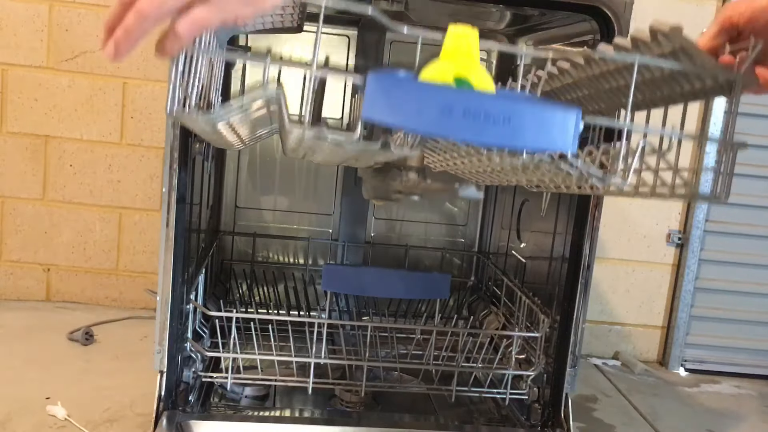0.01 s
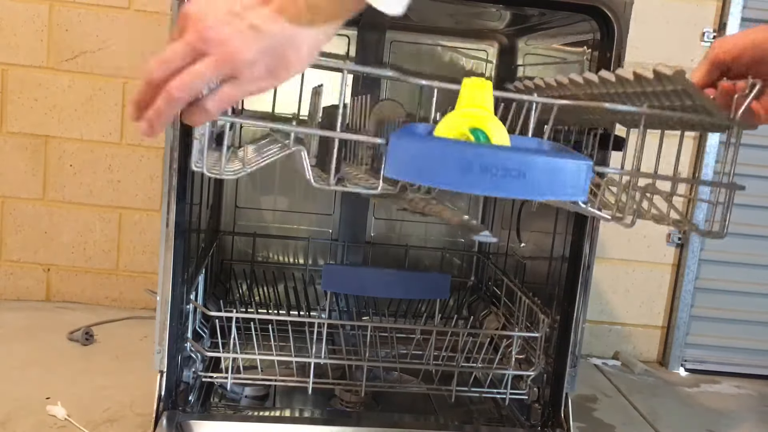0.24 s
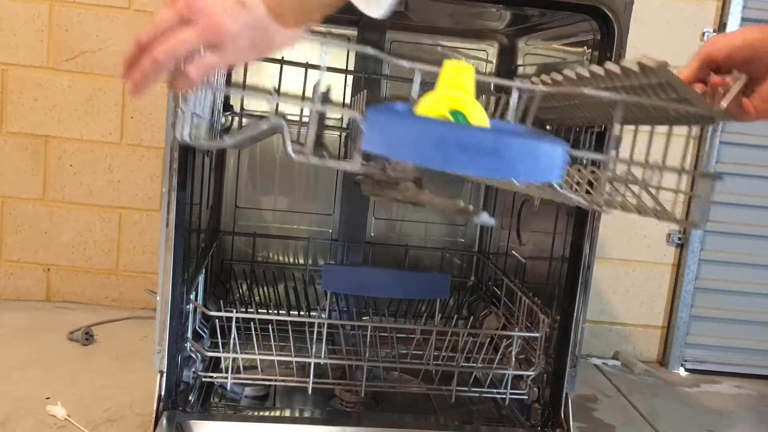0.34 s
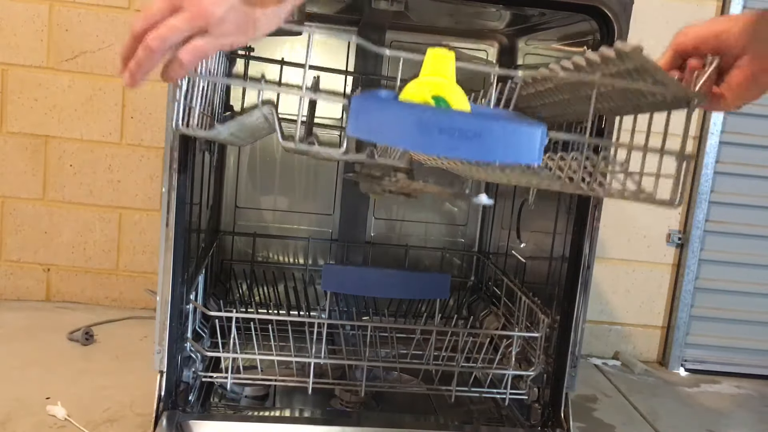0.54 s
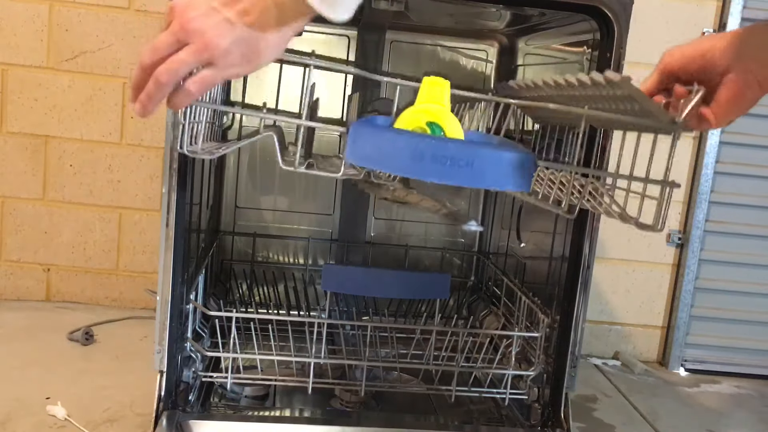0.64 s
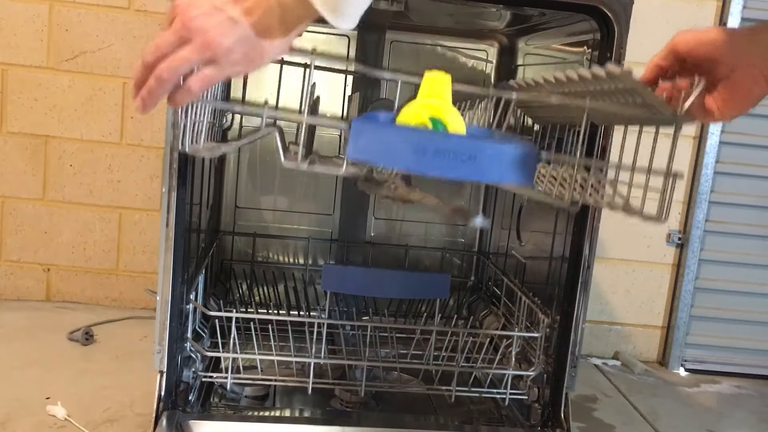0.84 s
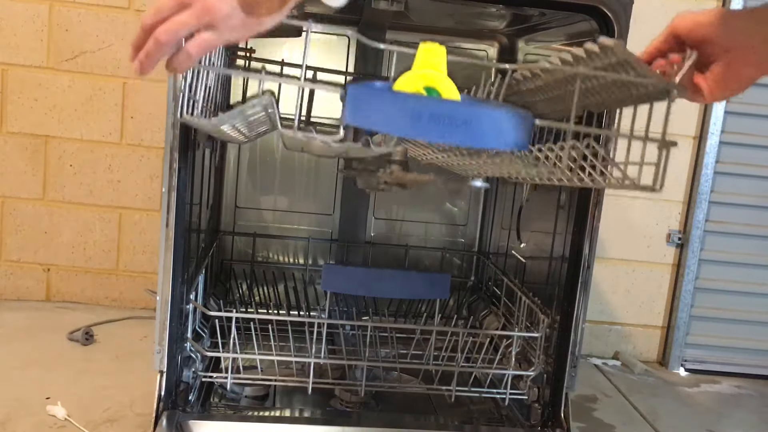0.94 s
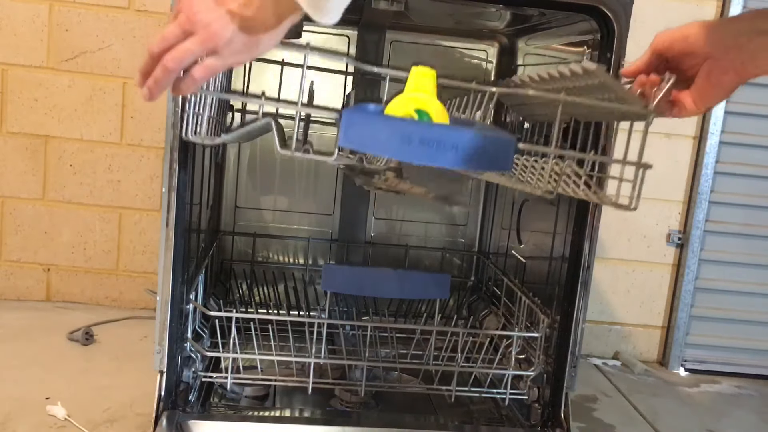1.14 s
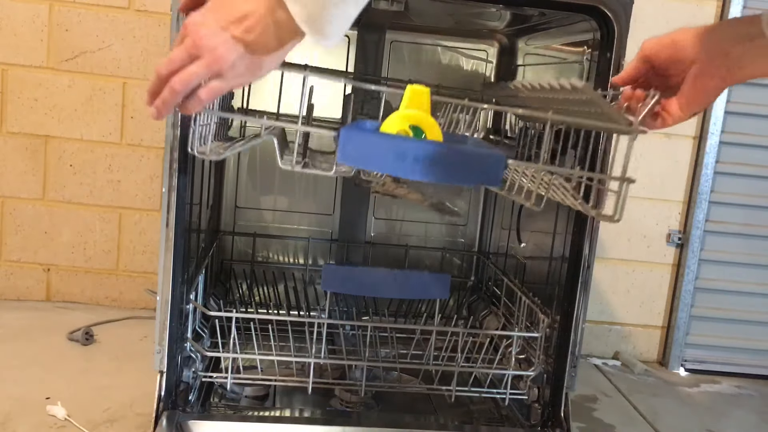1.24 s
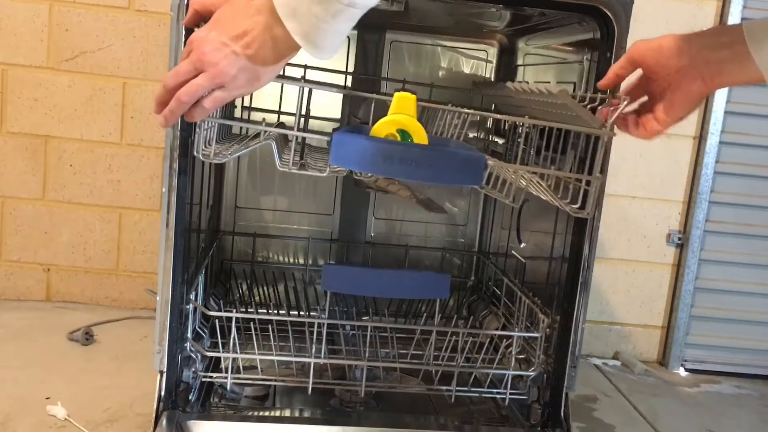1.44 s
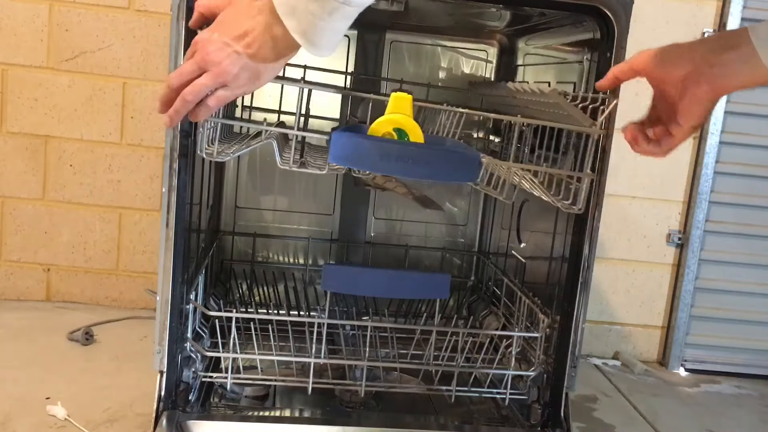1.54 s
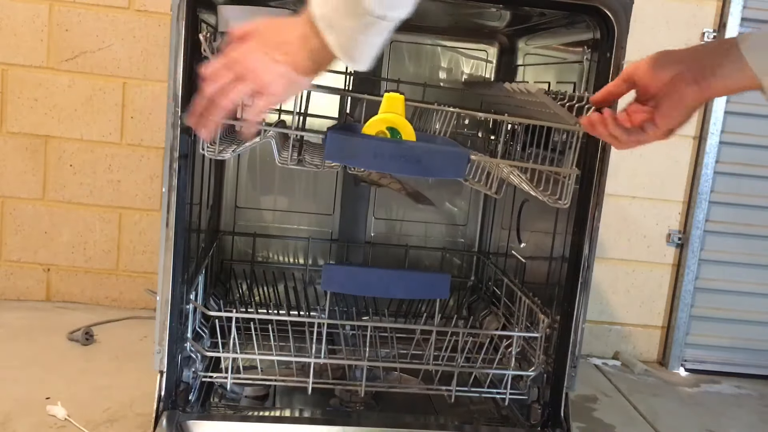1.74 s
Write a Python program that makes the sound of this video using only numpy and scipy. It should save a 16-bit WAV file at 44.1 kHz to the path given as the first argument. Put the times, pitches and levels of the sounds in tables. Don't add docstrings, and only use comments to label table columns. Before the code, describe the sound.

A metal wire dishwasher rack is fitted onto its rails. Faint touches from 0.1 s lead to a dense, jangling clatter at 0.25-0.31 s with a hollow tub thump. After a short gap, a brighter, hard clack lands at 0.64-0.67 s with another boom. Light clinks and shivering wires follow from 0.8 to 1.35 s, fading to faint ticks near 1.7 s. Hard-walled room echo, quiet low hush.

```python
import sys
import numpy as np
from scipy import signal
from scipy.fft import rfft, irfft
from scipy.io import wavfile
from scipy.ndimage import uniform_filter1d

SR = 44100
rng = np.random.default_rng(int(sys.argv[2]) if len(sys.argv) > 2 else 0)


def dump_mix(stems):
    frames = np.atleast_2d(stems).T
    limited = np.clip(frames, -1, 1)
    pcm = np.round(limited * 32767).astype(np.int16)
    wavfile.write(sys.argv[1], SR, pcm)


def makeup_ratio(level_db):
    decades = np.asarray(level_db, float) / 20
    return 10 ** decades


N = 79380


def evened(x):
    return x / np.sqrt(np.mean(x ** 2) + 1e-20)


def unit_energy(x):
    return x / np.linalg.norm(x)


def read(points, hz):
    f, value = np.transpose(points)
    return np.interp(np.log(hz + 1), np.log(f + 1), value)


def add(mix, s, sound):
    part = mix[max(round(s * SR), 0):][:len(sound)]
    part += sound[:len(part)]


def ring(modes, t, extra_db, phase):
    hz, db, t60 = np.transpose(modes)[:, :, None]
    decay = makeup_ratio(db + extra_db[:, None] - 60 * t / t60)
    return (decay * np.sin(2 * np.pi * (hz * t + phase[:, None]))).sum(0)


def clicks(count, per_s):
    draw = rng.random((count, 3))
    size = makeup_ratio(-4.5 * np.log(draw[:, 0] + 0.015))
    return size * np.sign(draw[:, 1] - 0.5) * (draw[:, 2] < per_s / SR)


def spot_db(hz, bright_db, clank_hz):
    octaves = np.log2((hz + 1) / clank_hz)
    return bright_db * np.log2((hz + 50) / 4000) + 6.0 * np.exp(-(octaves / 0.2) ** 2)


def wire_thicket(colour, bright_db, clank_hz):
    size, t60_s, evenness, patchy_db = 4096, 0.052, 0.7, 1.0
    hz = np.fft.rfftfreq(size, 1 / SR)
    burst = rng.standard_normal(size) * makeup_ratio(-60 * np.arange(size) / SR / t60_s)
    spectrum = rfft(burst)
    burst = irfft(spectrum / (abs(spectrum) + 1e-9) ** evenness)
    patches = evened(uniform_filter1d(rng.standard_normal(len(hz)), size=50))
    level_db = read(colour, hz) + spot_db(hz, bright_db, clank_hz) + patchy_db * patches
    taps = signal.firwin2(255, hz, makeup_ratio(level_db), fs=SR)
    return np.convolve(burst, taps)[120:]


# f/Hz, level/dB, t60/s
TINE_MODES = [(1568, 3.5, 0.48), (2326, 12.5, 0.26), (2700, -9, 0.13), (2800, -5, 0.42), (3472, -4, 0.1),
              (3390, -21, 0.41), (3680, -35, .15), (4086, -21, 0.17), (5130, -6, 0.27), (5600, 11, 0.079),
              (6300, 0, 0.36), (6800, 1, 0.067), (8700, 12, 0.36), (10200, -7, 0.31)]


def ringing_tines(bright_db, clank_hz):
    detune, spread_db, struck_db = 0.012, 3.0, 12
    t = np.arange(8192) / SR
    bunch = np.tile(TINE_MODES, (3, 1))
    draw = rng.standard_normal((2, len(bunch)))
    bunch[:, 0] *= 1 + detune * draw[1]
    hz = bunch[:, 0]
    struck = abs(hz / clank_hz - 1) < 0.03
    extra_db = spread_db * draw[0] + spot_db(hz, bright_db, clank_hz) + struck_db * struck
    return ring(bunch, t, extra_db, np.zeros(len(bunch)))


def rack_body(colour, bright_db, clank_hz):
    out = makeup_ratio(-16) * unit_energy(ringing_tines(bright_db, clank_hz))
    add(out, 0, unit_energy(wire_thicket(colour, bright_db, clank_hz)))
    return out


# t/s, peak level/dB, chatter length/s, brightness/(dB per octave), clank f/Hz
SETTING_DOWN = [(0.1, -40, 0.0084, -0.3, 6170), (0.152, -40.5, .011, -3, 5330),
                (0.167, -34.5, 0.013, -2, 2820), (0.191, -42.5, .02, -7, 2200),
                (0.229, -36, 0.0068, -7, 3300), (0.2466, -23.5, 0.0071, -3, 2400),
                (0.26, -14.5, 0.016, 1, 5740), (0.2789, -12, 0.0086, 0.5, 4100),
                (0.291, -12, 0.0075, -0.3, 3030), (0.3066, -18, 0.013, -0.2, 8800),
                (0.346, -34.5, .015, -7, 2850), (0.622, -36, 0.012, 2, 2700),
                (0.631, -30.5, 0.014, -5, 2920), (0.6431, -8, 0.014, 3.5, 3300),
                (0.653, -8.5, 0.013, 1.5, 6300), (0.6707, -12.5, 0.016, -1.4, 3700)]
SLIDING_IN = [(0.823, -30.5, 0.025, -1.5, 4160), (0.858, -50, 0.0063, -15, 8600),
              (0.924, -28, 0.0063, -4.5, 3200), (0.931, -29.5, 0.01, 4.5, 5130),
              (.9665, -31.5, 0.0065, -5, 1540), (1.068, -31, 0.014, 0, 3030),
              (1.255, -28, 0.0067, -1.5, 2570), (1.261, -24.5, 0.0073, .5, 4800),
              (1.297, -24.5, 0.019, -.5, 2950), (1.319, -27.5, 0.0085, -0.6, 6660),
              (1.616, -37, 0.013, -1.5, 1900), (1.716, -47, 0.011, -0.5, 2800),
              (1.75, -46, 0.0065, -2.5, 2800)]
# f/Hz, level/dB per Hz
FIRM_WIRES = [(180, -54), (300, -5), (1280, -6.5), (1640, -3.5), (3950, -4), (4370, -6), (6410, -7),
              (10600, -15.5), (16000, -29)]
# f/Hz, level/dB per Hz
LIGHT_TOUCH_WIRES = [(180, -33), (300, -9.5), (1300, -9.5), (2790, -2.5), (4370, -7), (6740, -9.5),
                     (7440, -19), (10200, -16), (16000, -38)]


def rack_contacts():
    rails_meet_s, rise_s, per_s, level_db = 0.8, 0.0013, 4000, -7
    out, t = np.zeros(N), np.arange(4000) / SR
    for s, db, length, bright_db, clank_hz in SETTING_DOWN + SLIDING_IN:
        colour = FIRM_WIRES if s < rails_meet_s else LIGHT_TOUCH_WIRES
        shape = np.minimum(t / rise_s, 1) * np.exp(-(t / max(length, 0.002)) ** 2)
        drive = clicks(len(t), per_s) * shape
        drive = unit_energy(drive) * np.linalg.norm(shape)
        body = rack_body(colour, bright_db, clank_hz)
        add(out, s, makeup_ratio(db + level_db) * signal.fftconvolve(drive, body))
    return out


# t/s, level/dB
SHIVER_LEVEL = [(0, -77), (.1, -80), (.2, -64), (.4, -54), (.6, -59), (.8, -50), (1.0, -57.5), (1.2, -59),
                (1.4, -61.5), (1.55, -61), (1.8, -66.5)]
# f/Hz, level/dB per Hz
SHIVER_SPECTRUM = [(400, 3.5), (1500, -1), (2700, -0.5), (4000, -3.5), (9000, -13), (10400, -7),
                   (11600, -22), (16000, -35)]


def rack_shiver():
    out = np.zeros(N)
    level = makeup_ratio(np.interp(np.arange(N) / SR, *np.transpose(SHIVER_LEVEL)) - 5)
    for spot_hz in (1900, 2690, 3300, 5460, 10800):
        drive = level * evened(clicks(N, per_s=600))
        out += signal.fftconvolve(drive, rack_body(SHIVER_SPECTRUM, 0, spot_hz))[:N]
    return out


# t/s, level/dB, share of upper modes level/dB
TUB_JOLTS = [(0.026, -52, -23), (.108, -41, 7), (0.126, -36, -4), (0.161, -40, -8), (0.185, -31, -11),
             (0.202, -28.5, -7), (0.259, -19.5, 1.5), (.285, -20, 5), (0.317, -23, -9), (0.367, -29, -29),
             (.39, -35.5, 4), (.455, -58, -10), (0.588, -49, 9), (.645, -28.5, 7), (.665, -17, 3),
             (0.704, -26, 9.5), (0.744, -44, -2), (0.841, -34, 6.5), (0.941, -31, -7), (0.975, -36, -0.5),
             (1.033, -47, 0), (1.08, -32.5, 0), (1.764, -48, -13), (1.249, -38.5, 5), (1.29, -36, -5.5),
             (1.33, -40, 11.5), (1.415, -45, 10), (1.507, -44, 2), (1.644, -40.5, -1.5),
             (1.699, -40.5, -12)]
# f/Hz, level/dB, t60/s
LOWER_PANEL_MODES = [(51.7, -11, 0.19), (73.4, -9, 0.23), (110.7, 7, 0.077), (126, 5.05, 0.13),
                     (151.6, -5.5, 0.12)]
# f/Hz, level/dB, t60/s
UPPER_PANEL_MODES = [(193.2, -10.5, 0.21), (222.6, -11, 0.11), (309.1, -11, 0.18), (335.5, -11, 0.13),
                     (378, -13.5, .12), (458.2, -25.5, 0.26), (577, -18.5, 0.2), (689, -20.5, 0.17)]


def tub():
    rise_s, spread_db = 0.007, 5.5
    modes = LOWER_PANEL_MODES + UPPER_PANEL_MODES
    is_upper = np.arange(len(modes)) >= len(LOWER_PANEL_MODES)
    out, t = np.zeros(N), np.arange(SR // 4) / SR
    for s, db, upper_db in TUB_JOLTS:
        draw = rng.random((2, len(modes)))
        extra_db = spread_db * (draw[0] - 0.5) + upper_db * is_upper
        boom = (1 - np.exp(-t / rise_s)) * ring(modes, t, extra_db, draw[1])
        add(out, s, makeup_ratio(db) * boom)
    return out


# f/Hz, t60/s
WORKSHOP_DECAY = [(100, 0.78), (400, 0.56), (1500, 0.64), (4000, 0.5), (8000, 0.38), (15000, 0.28)]


def workshop(x):
    rise_s, turns_per_s, patterns = 0.004, 5, 3
    out, turn = np.zeros(N), np.arange(N) / SR * turns_per_s
    at = np.arange(200, SR - 20, 20)
    for k in range(patterns):
        taps = np.zeros(SR)
        taps[at + rng.integers(0, 20, len(at))] = rng.choice([-1., 1.], len(at))
        hz, t, z = signal.stft(taps, SR, nperseg=512)
        decay = makeup_ratio(-60 * t / read(WORKSHOP_DECAY, hz)[:, None])
        tail = signal.istft(z * decay, SR, nperseg=512)[1]
        tail = tail * (1 - np.exp(-np.arange(len(tail)) / SR / rise_s))
        share = np.sqrt(2 / 3) * np.cos(2 * np.pi * (turn + k / patterns))
        out += signal.fftconvolve(x * share, unit_energy(tail))[:N]
    return out


# f/Hz, level/dB per Hz
FLOOR_SPECTRUM = [(18, -24), (30, 14), (287, 4.5), (1100, -18.5), (1430, -9.5), (4780, -28), (10800, -25.5),
                  (12000, -23), (16000, -30)]


def noise_floor():
    spectrum = rfft(rng.standard_normal(N)) * makeup_ratio(read(FLOOR_SPECTRUM, np.fft.rfftfreq(N, 1 / SR)))
    return makeup_ratio(-58.5) * evened(irfft(spectrum, N))


def scene():
    wires, panels = rack_contacts() + rack_shiver(), tub()
    reverberant = workshop(makeup_ratio(-7) * wires + makeup_ratio(-7) * panels)
    return (wires + panels + reverberant + noise_floor())[None]


def low_pass(x):
    return signal.sosfilt(signal.butter(12, 16820, fs=SR, output="sos"), x)


def record(dry):
    low_cut = signal.butter(3, 48, "high", fs=SR, output="sos")
    band_limit = signal.firwin(301, 16000, window=("kaiser", 8), fs=SR)
    mix = signal.sosfilt(low_cut, dry)
    mix = signal.oaconvolve(mix, band_limit[None], "same")
    return low_pass(mix)


dry = scene()
out = record(dry)
dump_mix(out)
```